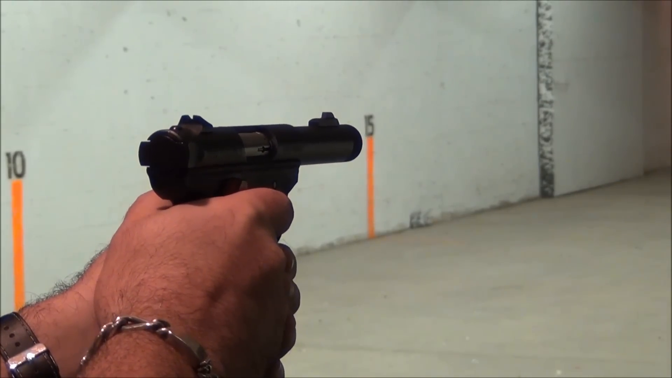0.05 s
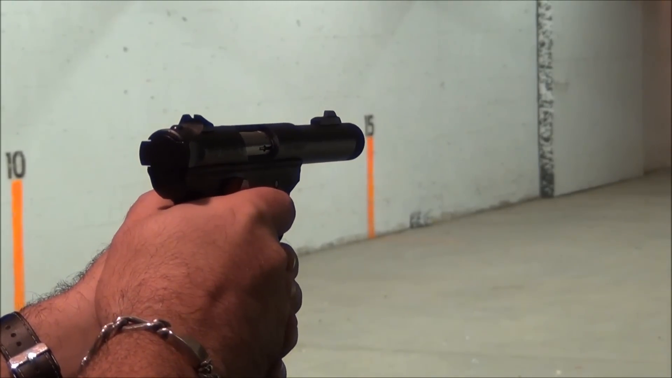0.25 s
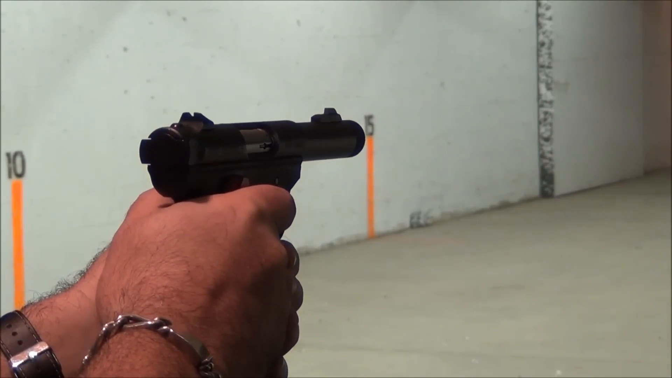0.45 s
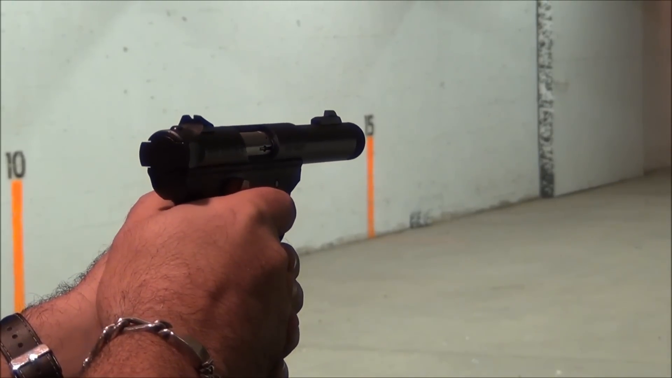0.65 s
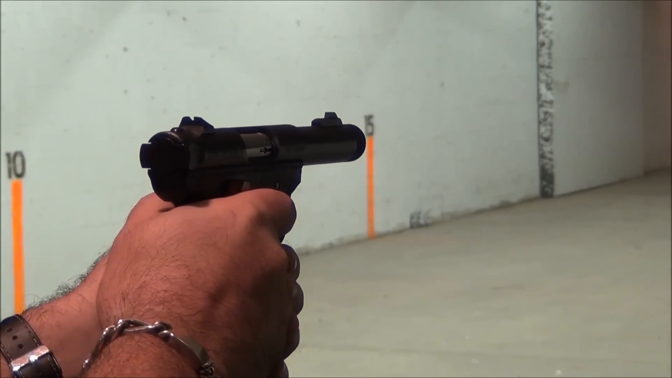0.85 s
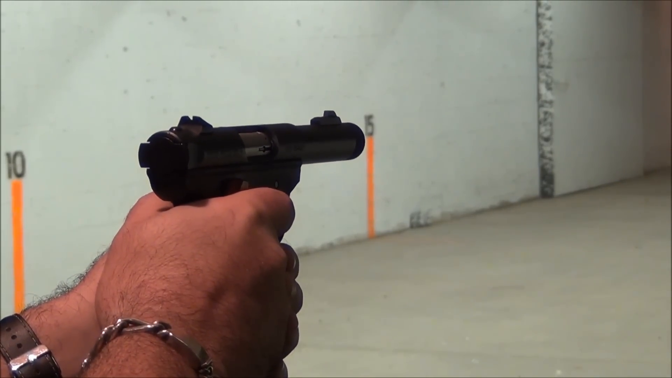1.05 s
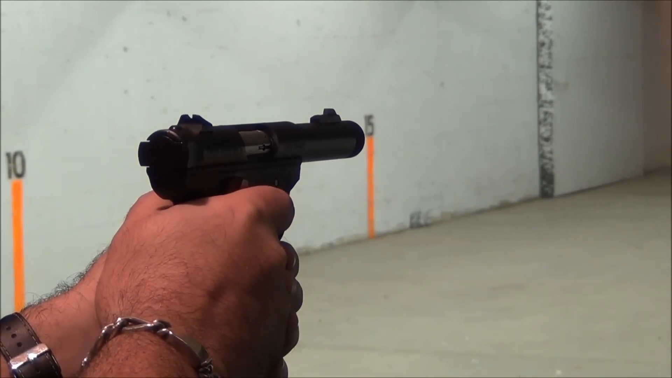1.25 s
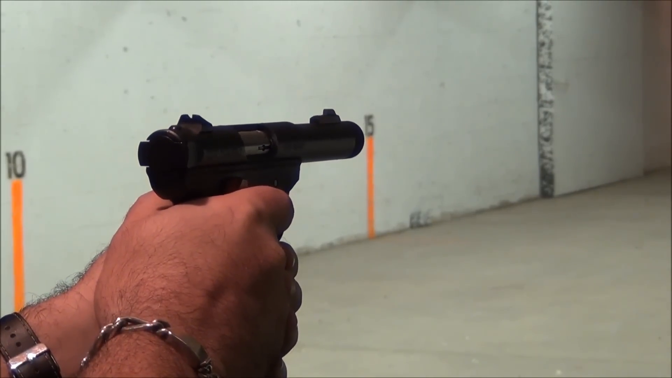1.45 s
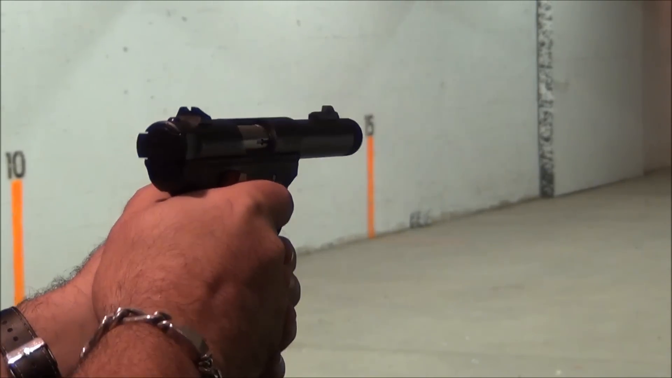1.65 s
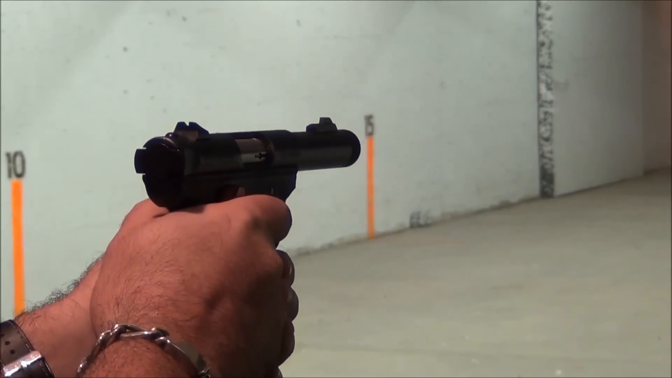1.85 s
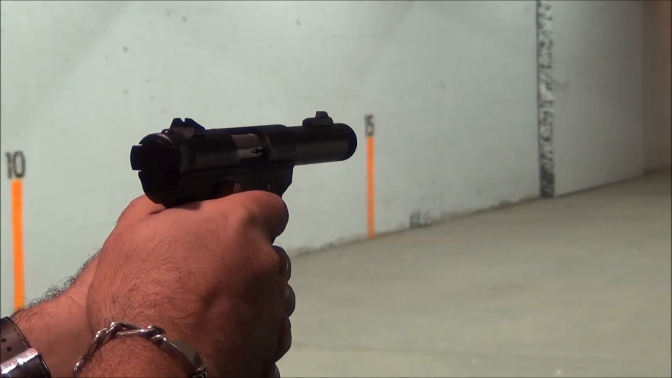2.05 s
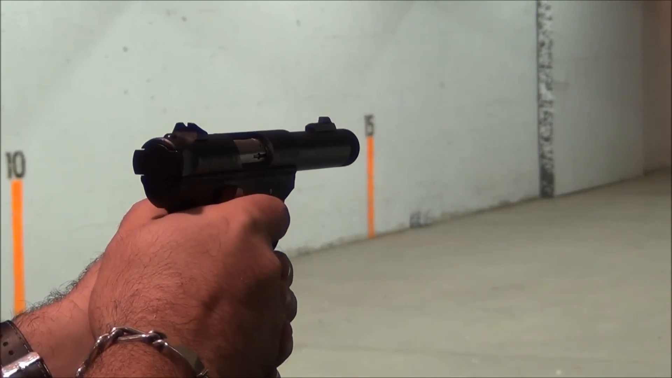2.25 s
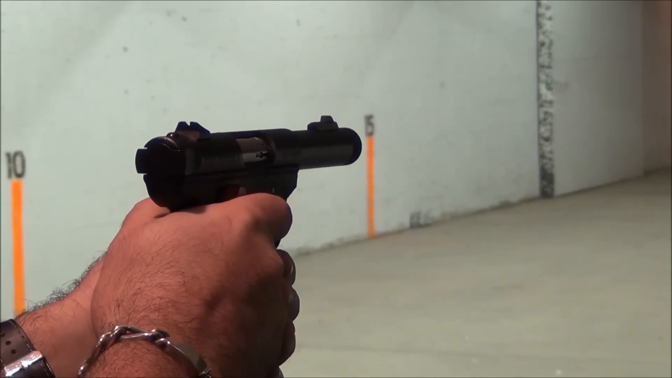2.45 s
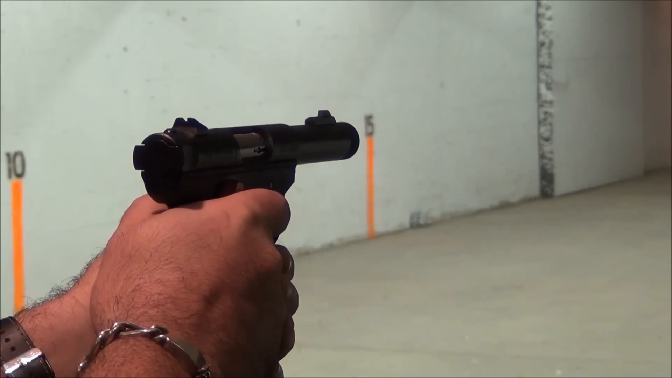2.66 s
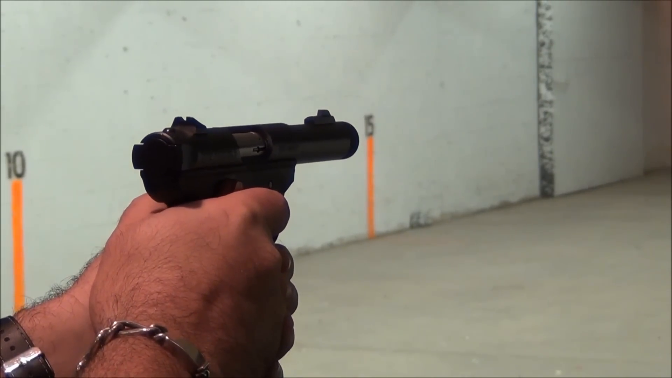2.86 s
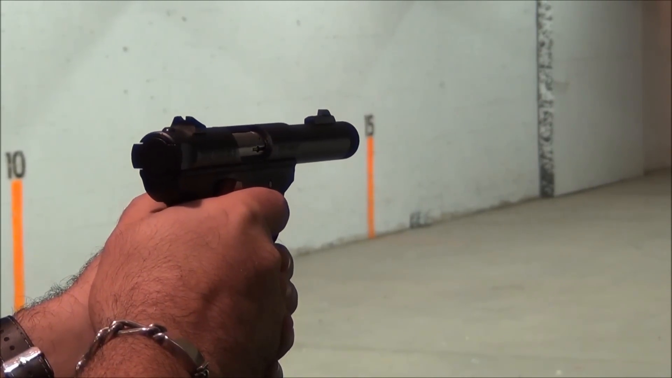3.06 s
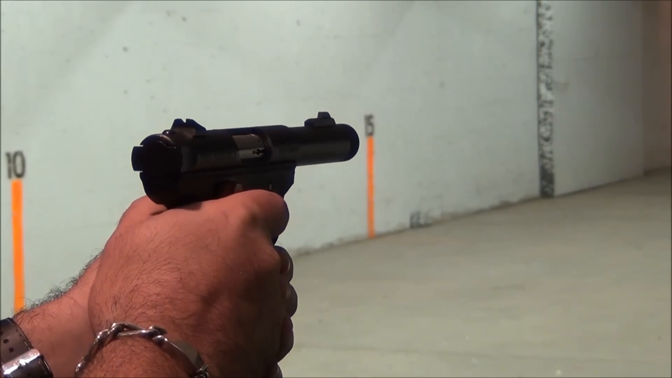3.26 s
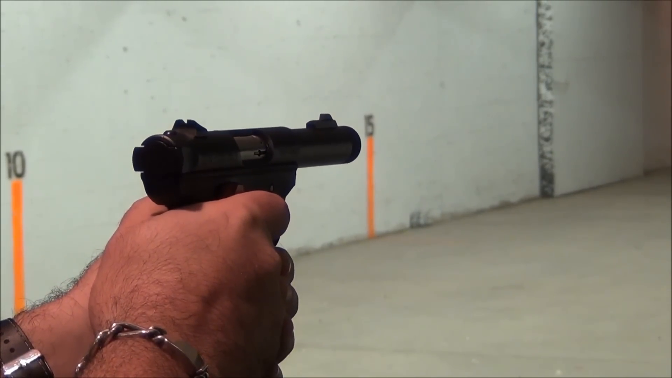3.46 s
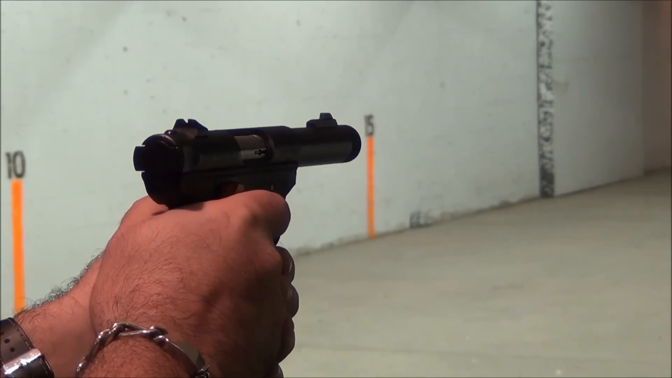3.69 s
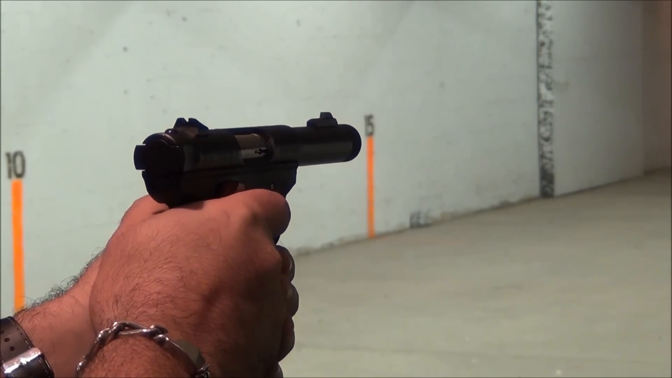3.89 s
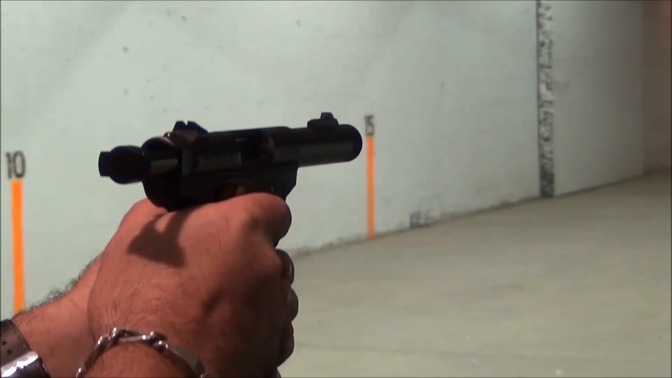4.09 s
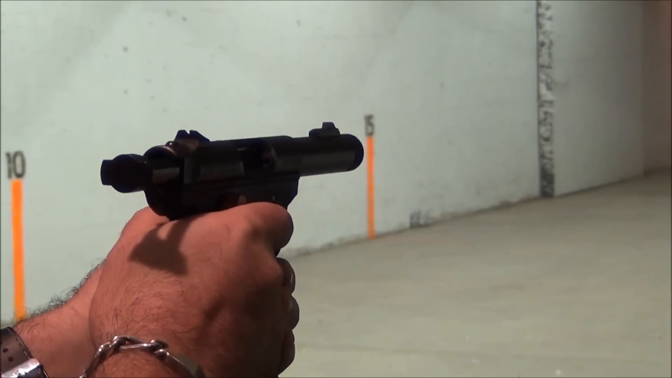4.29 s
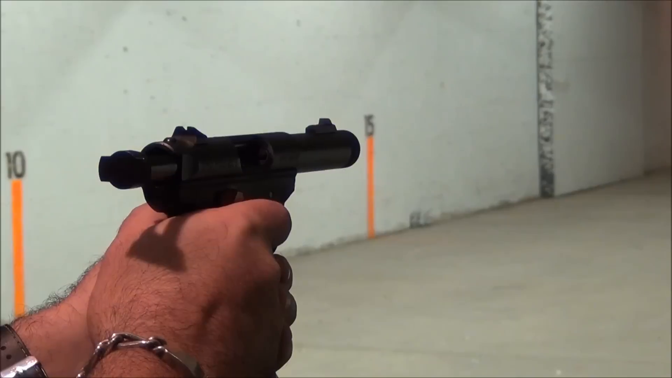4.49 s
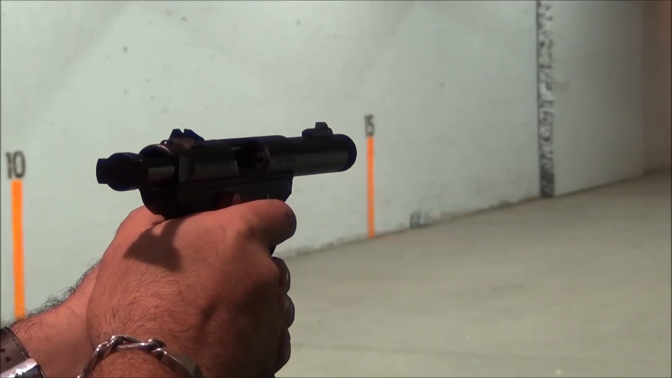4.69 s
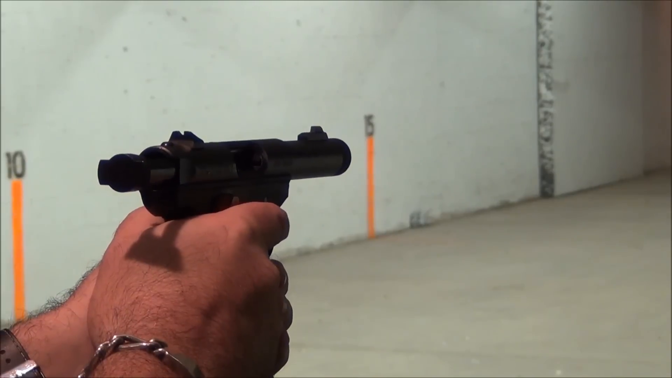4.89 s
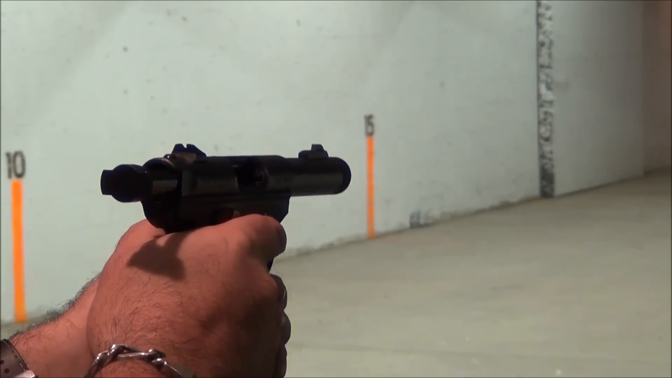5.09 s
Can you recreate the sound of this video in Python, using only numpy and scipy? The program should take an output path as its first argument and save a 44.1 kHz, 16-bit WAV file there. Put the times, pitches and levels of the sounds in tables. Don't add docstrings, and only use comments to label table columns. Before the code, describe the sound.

A long bare concrete shooting range, heard from close behind a small-bore pistol through a camera microphone with automatic gain. At the start, low turbulent ventilation air and very faint, wavering high fan tones creep up in level, with brief treble scuffs of grit and small brass tinkles in the first 0.6 seconds and again near 1.05. At about 1.6 seconds a tiny click and puff of gas run straight into a sharp, midrange-heavy blast, squashed by the recorder, with quick slapping reflections and a dense tail lasting over a second. Around 2.33 to 2.6 a spent case hits the floor with bright clacks and short rings; fainter ticks and scuffs follow as the air noise slowly returns. At about 4.0 a second, slightly weaker shot cracks and reverberates, the background ducking again. Small brass ticks, including a flat clack near 4.9, sound in the fading tail.

```python
import sys
import numpy as np
from scipy import signal
from scipy.fft import rfft, irfft
from scipy.io import wavfile
from scipy.ndimage import uniform_filter1d

SR = 44100
rng = np.random.default_rng(int(sys.argv[2]) if len(sys.argv) > 2 else 0)


def volts_from_decibels(level):
    exponent = np.asarray(level, float) / 20
    return 10 ** exponent


def unload_audio(sound):
    columns = np.transpose(np.atleast_2d(sound))
    steps = np.round(np.clip(columns, -1, 1) * 32767)
    wavfile.write(sys.argv[1], SR, steps.astype(np.int16))


N = 226365


def evened(x):
    return x / np.sqrt(np.mean(x ** 2) + 1e-20)


def read(points, hz):
    f, value = np.transpose(points)
    return np.interp(np.log(hz + 1), np.log(f + 1), value)


def add(mix, start_s, sound):
    part = mix[..., round(start_s * SR):][..., :sound.shape[-1]]
    part += sound[..., :part.shape[-1]]


def stereo(mid, side):
    return np.array([mid + side, mid - side])


def band(x, lo_hz, hi_hz):
    return signal.sosfilt(signal.butter(2, [lo_hz, hi_hz], "bandpass", fs=SR, output="sos"), x)


# (frequency [Hz], density [dB per Hz])
AIR_SPECTRUM = [(15, -46), (25, -11), (85, -1.5), (226, -1), (304, -6), (538, -6.5), (706, -9),
                (1010, -13.5), (1600, -13), (3230, -26.5), (3910, -28), (6920, -35), (12200, -42.5),
                (14800, -45.5), (16500, -69)]
# (frequency [Hz], side minus mid [dB])
AIR_WIDTH = [(60, -50), (110, -53.5), (200, -40), (380, -37), (700, -15.5), (1290, -12), (2380, -13.5),
             (4400, -9), (8120, -7), (15000, -26.5)]
AIR_LEVEL_DB = -47.5


def ventilation():
    frames, hz = N // 256 + 5, np.fft.rfftfreq(1024, 1 / SR)
    a, b, c, d, patches = rng.standard_normal((frames, 513, 5)).T
    patches = uniform_filter1d(patches, size=10, axis=0)
    patches = evened(uniform_filter1d(patches, size=12, axis=1))
    gusts = evened(uniform_filter1d(rng.standard_normal(frames), size=7))
    gusts = gusts * np.minimum(hz / 8000, 1)[:, None]
    side = (c + 1j * d) * volts_from_decibels(read(AIR_WIDTH, hz))[:, None]
    z = np.array([a + 1j * b, side])
    z *= volts_from_decibels(read(AIR_SPECTRUM, hz)[:, None] + 1.2 * patches + 2.6 * gusts)
    mid, side = signal.istft(z, nperseg=1024, noverlap=768)[1][:, :N]
    return volts_from_decibels(AIR_LEVEL_DB) * stereo(mid, side) / np.sqrt(np.mean(mid ** 2))


# (frequency [Hz], level [dB])
FAN_TONES = [(2492, -85), (3677, -108), (3876, -84.5), (4447, -74), (5082, -86), (5216, -74.5),
             (5663, -79.5), (5868, -88), (6433, -89)]


def whine():
    t, mix = np.arange(N) / SR, np.zeros(N)
    drifts = rng.standard_normal((len(FAN_TONES), 2, N // 512 + 1))
    for (hz, db), drift in zip(FAN_TONES, drifts):
        knots_s = np.arange(drift.shape[1]) * 512 / SR
        swell, sway = (np.interp(t, knots_s, evened(uniform_filter1d(d, size=9))) for d in drift)
        phase = 2 * np.pi * np.cumsum(hz + 25 * sway) / SR
        mix += volts_from_decibels(db + 4 * swell) * np.sin(phase)
    return mix


STRAY_GAP_S, STRAY_DB, STRAY_SPREAD_DB, STRAY_LOW_DB = .11, -71.5, 5, -7


def strays():
    starts = np.arange(0, N / SR, STRAY_GAP_S)
    events = []
    for start, (late, strength) in zip(starts, rng.random((len(starts), 2))):
        db = STRAY_DB + STRAY_SPREAD_DB * (2 * strength - 1)
        events.append((start + STRAY_GAP_S * late, db, STRAY_LOW_DB))
    return events


# (time [s], treble level [dB], lower band relative to treble [dB])
SCUFFS = [(0.062, -62.5, 2.5), (0.4574, -63, -3), (0.5691, -64, -5), (0.65, -58.5, -4.5),
          (0.679, -61.5, 1.5), (0.7724, -62, -4), (0.8797, -60.5, -4), (1.056, -64, 6),
          (1.0849, -57.5, -7.5), (1.579, -75.5, -4), (1.1513, -58, -1.5), (1.1967, -60, -3),
          (1.219, -67, 3), (0.9994, -67, -11), (1.4262, -66, -1), (1.483, -64, -3), (2.4957, -63, 3),
          (2.5836, -59.5, 2), (2.882, -60, -5), (3.8594, -63.5, -4), (3.1607, -65, -2), (3.4526, -64.5, -2),
          (3.5116, -59, -7), (3.5563, -63.5, -4), (3.7237, -61.5, 0.5), (3.813, -58.5, 1.5),
          (3.93, -61.5, -3), (4.6494, -60, -4), (4.9276, -58.5, 3), (5.0736, -61, -3)]
SCUFF_T60_S, DRAG_S_PER_DB = 0.25, .005


def scuffs():
    t, mix = np.arange(6500) / SR, np.zeros((2, N))
    for start_s, db, low_db in SCUFFS + strays():
        t60 = max(SCUFF_T60_S + DRAG_S_PER_DB * low_db, .05)
        noise, pick = rng.standard_normal((2, len(t))), rng.random((5, 2))
        tone_hz = 3600 + 2500 * pick[:, 0]
        tones = np.sin(2 * np.pi * (np.outer(tone_hz, t) + pick[:, 1:])).sum(0)
        low = evened(band(noise, 3370, 6500)) + volts_from_decibels(-9) * tones * [[1], [0]]
        puff = evened(band(noise, 7000, 17000)) + volts_from_decibels(min(low_db, 4)) * low
        grit = volts_from_decibels(1.4 * evened(uniform_filter1d(noise[1, ::-1], size=150)))
        fade = volts_from_decibels(db - 8.5 - 60 * t / t60) * (1 - np.exp(-t / 0.0012)) * grit
        add(mix, start_s, stereo(puff[0], volts_from_decibels(-12.0) * puff[1]) * fade)
    return mix


# (time [s], tick level [dB], upper ring level [dB], lower ring level [dB])
BOUNCES = [(0.004, -64, -68, -63), (0.103, -59.5, -52.5, -52), (0.2818, -71, -60, -48.5),
           (0.394, -65, -80, -55), (0.5444, -79, -77, -79), (1.053, -60, -78, -55), (2.3278, -50, -52, -50),
           (2.3305, -51, -60, -49), (2.3634, -58, -76, -69), (2.3794, -65, -65, -74),
           (2.4948, -56.5, -82, -67), (2.5845, -63, -73, -70), (2.8888, -64, -69, -76),
           (3.1894, -72, -67, -78), (3.2144, -75, -75, -82), (3.3894, -73.5, -68, -81),
           (3.4194, -75, -73, -78), (3.456, -71, -65, -70), (3.7244, -68, -79, -66), (4.867, -71, -64, -51),
           (4.8844, -78, -71, -77)]
CLACKS = [
    (2.3486, -40, -90.0, -62),
    (4.9263, -58, -90.0, -66),
]
# (frequency [Hz], t60 [s], smear as the tube spins [Hz])
BRASS_MODES = [(12020, 0.1, 230), (5730, 0.014, 220)]
TICK_T60_S, SPLASH_T60_S = .011, .07


def cases():
    t, mix = np.arange(4500) / SR, np.zeros(N)
    for start_s, tick_db, *rings_db in BOUNCES + CLACKS:
        noise = rng.standard_normal((3, len(t)))
        fade = volts_from_decibels(2 - 60 * t / TICK_T60_S) + volts_from_decibels(-15 - 60 * t / SPLASH_T60_S)
        sound = volts_from_decibels(tick_db) * fade * evened(band(noise[0], 2500, 16000))
        for db, (hz, t60, smear_hz), n in zip(rings_db, BRASS_MODES, noise[1:]):
            flutter = 1.24 + 0.65 * evened(uniform_filter1d(n, size=int(SR / smear_hz)))
            sound = sound + volts_from_decibels(db - 4 - 60 * t / t60) * flutter * np.sin(2 * np.pi * hz * t)
        add(mix, start_s + .0007, sound)
    return stereo(mix, volts_from_decibels(-15) * np.roll(mix, 9))


CLICK_DB, CLICK_HZ, CLICK_T60_S = -36., 3800, .012
RISE_DB, LEAD_S = -33., .0055


def lead_in():
    t, mix = np.arange(round(LEAD_S * SR)) / SR, np.zeros(N)
    for shot_s, _ in SHOTS:
        noise = rng.standard_normal(len(t))
        click = volts_from_decibels(CLICK_DB - 60 * t / CLICK_T60_S) * evened(band(noise, CLICK_HZ / 1.3, CLICK_HZ * 1.3))
        rise_db = RISE_DB - 14 * (1 - t / LEAD_S)
        rise = volts_from_decibels(rise_db) * evened(band(noise, 1500, 14000))
        add(mix, shot_s - LEAD_S, click + rise)
    return mix


# (time [s], charge level [dB])
SHOTS = [
    (1.6068, -4.5),
    (3.9978, -5.5),
]
# (frequency [Hz], late level [dB], late t60 [s], build-up [s],
# near-wall level [dB], near-wall t60 [s], likeness of the two shots [0-1])
HALL = [(50, -21, 0.79, 0.02, -24, .1, .9), (115, -15.5, 1.02, 0.03, -21.5, .1, 0.91),
        (222, -12, 1.5, 0.0037, -6, 0.27, 1), (406, 3.5, 1.313, 0.011, 11.5, 0.16, 0.93),
        (520, 3.5, 1.36, 0.014, -8, 0.11, 0.93), (850, 6.5, 1.301, 0.0064, 23, 0.038, 0.78),
        (1285, 5.5, 1.214, 0.0035, 7.5, 0.017, 0.98), (1780, 2, 1.24, 0.0015, 12, 0.046, 0.96),
        (2350, -5, 1.174, 0.0041, 15.5, 0.057, 0.93), (3410, -4, 1.204, 0.00081, 10, 0.045, 0.93),
        (5050, -8, 1.013, 0.002, 10, 0.062, 0), (7970, -7, 0.87, 0.00061, 5.5, 0.059, 0),
        (10600, -6.5, 0.64, .0005, 7.5, 0.032, 1), (12800, -10.5, 0.57, .0004, -0.5, 0.14, 0.3),
        (16000, -28, .5, .0004, -8.5, 0.076, .5)]
# (frequency [Hz], side minus mid [dB])
HALL_WIDTH = [(60, -24), (110, -33.5), (200, -37.5), (380, -34.5), (700, -19), (1290, -17), (2380, -15.5),
              (4400, -13.5), (8120, -18.5), (15000, -43)]
# (delay [s], level over the tail [dB], centre frequency [Hz], length [s])
ECHOES = [(0.023, 7.5, 7160, 0.005), (0.037, 0, 3900, 0.016), (0.039, 2.5, 290, 0.015),
          (0.063, 5, 2930, 0.014), (0.085, 6.5, 367, 0.024), (0.159, 6, 910, 0.014),
          (0.191, -1, 463, 0.072), (.20, 1, 540, 0.012), (0.3, 2.5, 400, 0.0092), (0.268, 0, 1100, 0.012),
          (.33, 2, 1100, 0.0046)]
BAFFLES = [(.046, 9, 9500, .0012), (.0655, 8, 8000, .0012), (.120, 5, 6000, .0015), (.1245, 9, 9000, .0012),
           (.139, 8, 8000, .0012), (.181, 5, 9000, .0012), (.273, 4, 9000, .002), (.293, 5, 9000, .002)]


def shots():
    t = np.arange(round(1.75 * SR)) / SR
    hz = np.fft.rfftfreq(len(t), 1 / SR)
    paths = rfft(rng.standard_normal((3, 2, len(t))))
    centres = np.geomspace(40, 16000, num=28)
    tails = np.zeros((len(SHOTS), 2, len(t)))
    hall_hz, *columns = np.transpose(HALL)
    for k, centre in enumerate(centres):
        settings = (read(list(zip(hall_hz, column)), centre) for column in columns)
        late_db, late_t60, build_s, near_db, near_t60, like = settings
        slot = read(list(zip(centres, np.arange(len(centres)) == k)), hz)
        part = irfft(paths * np.sin(np.pi / 2 * slot), len(t))
        part = part / np.sqrt(np.mean(part ** 2))
        echo_db = np.zeros(len(t))
        for delay_s, db, echo_hz, length_s in ECHOES + BAFFLES:
            echo_db += db * np.exp(-np.log(centre / echo_hz) ** 2 - ((t - delay_s) / length_s) ** 2)
        late = volts_from_decibels(late_db - 6.5 - 60 * t / late_t60 + echo_db)
        near = volts_from_decibels(near_db - 4 - 60 * t / near_t60)
        fade = (late + near) * (1 - np.exp(-(t / build_s) ** 2))
        like = np.clip(like, 0, 1)
        width = np.array([1, volts_from_decibels(read(HALL_WIDTH, centre))])[:, None]
        tails += (like * part[0] + np.sqrt(1 - like ** 2) * part[1:]) * width * fade
    mix = np.zeros((2, N))
    for (shot_s, db), (mid, side) in zip(SHOTS, tails):
        add(mix, shot_s, volts_from_decibels(db) * stereo(mid, side))
    return mix


def scene():
    background = ventilation() + volts_from_decibels(-4) * whine()
    floor = volts_from_decibels(9) * cases() + volts_from_decibels(12.0) * scuffs()
    return background + floor + lead_in() + shots()


SLAM_DB, SHELF_DB, REST_DB = -28, -13.5, -2
SLAM_DELAY_S, SPRING_S, WAIT_S, CREEP_S = 0.00037, 0.35, 0.58, 1.21
SPRING_BEND = 1.48
EARLIER_DROP_S = -0.81


def gain_db():
    t, blasts = np.arange(N) / SR, np.array([EARLIER_DROP_S] + [s for s, _ in SHOTS])
    since = t - blasts[np.searchsorted(blasts, t - SLAM_DELAY_S) - 1]
    spring = (SLAM_DB - SHELF_DB) * np.maximum(1 - since / SPRING_S, 0) ** SPRING_BEND
    creep = (REST_DB - SHELF_DB) * (1 - np.exp(-np.maximum(since - WAIT_S, 0) / CREEP_S))
    return uniform_filter1d(SHELF_DB + spring + creep, size=22)


# (frequency [Hz], level [dB])
TREBLE_LIMIT = [(12500, -120), (14200, -113), (15100, -106), (15800, -101)]
MASKING = .42


def starve(x):
    hz, _, z = signal.stft(x, SR, nperseg=1024, noverlap=512)
    power = (abs(z[:, :512]) ** 2).mean(0)
    loud_db = np.maximum(10 * np.log10(power.sum(0) + 1e-20) + 55, 0)
    band_power = power.reshape(64, 8, -1).mean(1)
    band_db = 10 * np.log10(np.repeat(band_power, 8, axis=0) + 1e-20)
    limit_db = read(TREBLE_LIMIT, hz[:512])[:, None] + MASKING * loud_db
    keep = 1 / (1 + volts_from_decibels(np.clip(6 * (limit_db - band_db), -80, 30)))
    keep = np.where(hz[:512, None] > TREBLE_LIMIT[0][0], keep, 1)
    keep = np.vstack([keep, keep[-1:]])
    return signal.istft(z * keep, SR, nperseg=1024, noverlap=512)[1][:, :N]


def own_noise(db, lo_hz, hi_hz):
    return volts_from_decibels(db) * evened(band(rng.standard_normal(N), lo_hz, hi_hz))


def top_cut(x):
    return signal.sosfilt(signal.butter(12, 16820, fs=SR, output="sos"), x)


CEILING, MIC_CUT_HZ = .42, 15900


def record(dry):
    ducked = dry * volts_from_decibels(gain_db())
    rumble = own_noise(-67.5, 74, 105)
    hiss = own_noise(-88., 9000, 15500)
    held = CEILING * np.tanh((ducked + rumble + hiss) / CEILING)
    edge = signal.firwin(511, MIC_CUT_HZ, window=("kaiser", 9), fs=SR)[None]
    mix = starve(signal.oaconvolve(held, edge, "same"))
    return top_cut(mix)


dry = scene()
out = record(dry)
unload_audio(out)
```